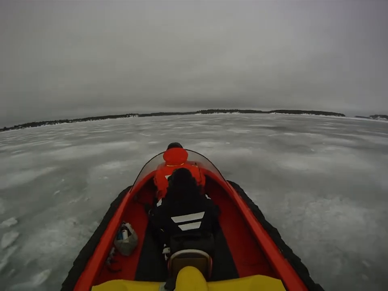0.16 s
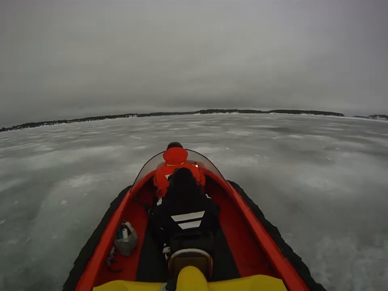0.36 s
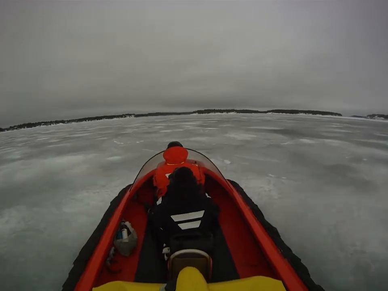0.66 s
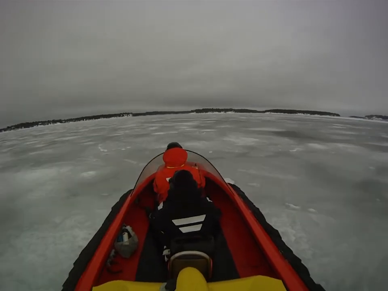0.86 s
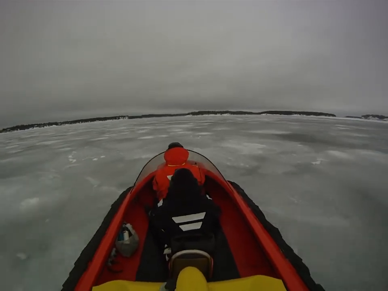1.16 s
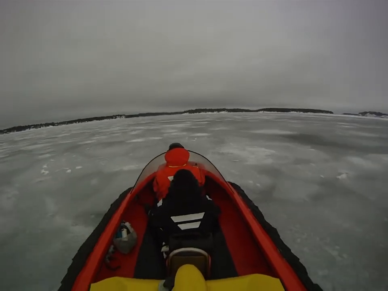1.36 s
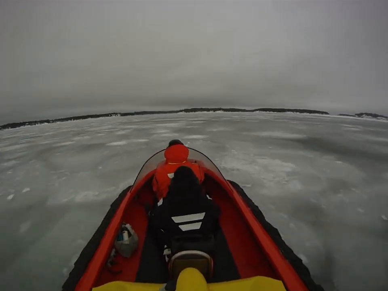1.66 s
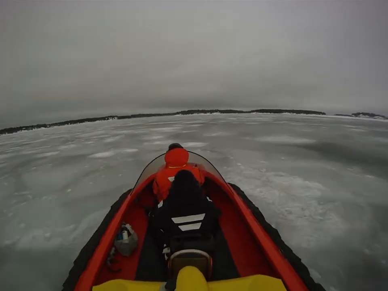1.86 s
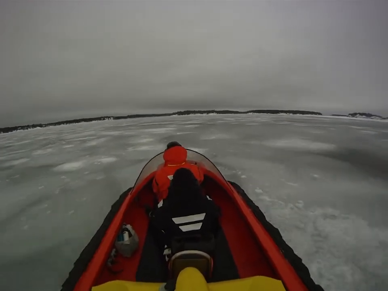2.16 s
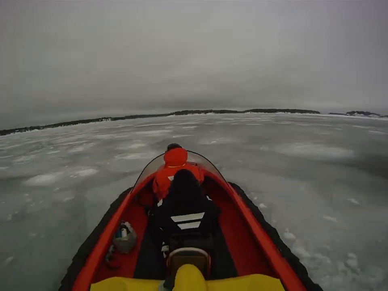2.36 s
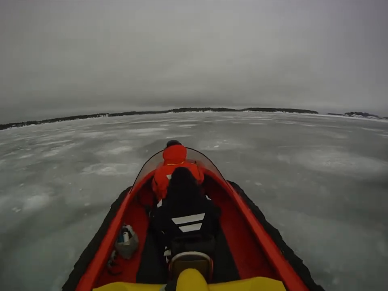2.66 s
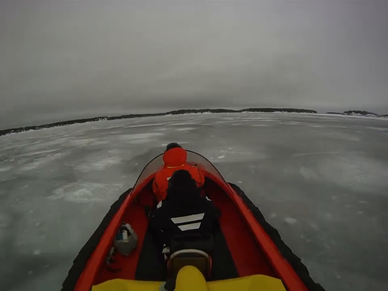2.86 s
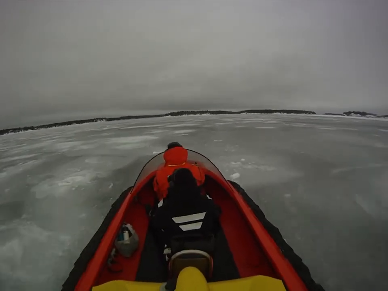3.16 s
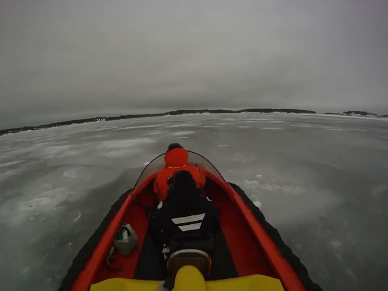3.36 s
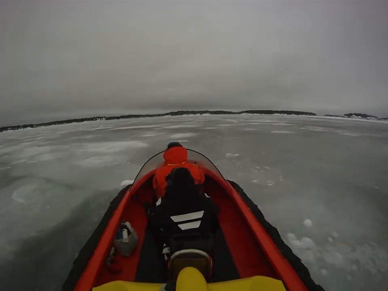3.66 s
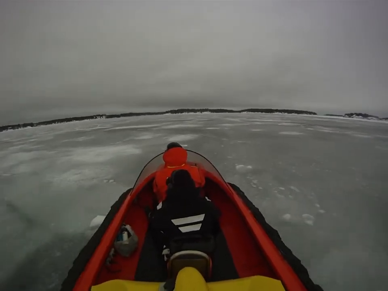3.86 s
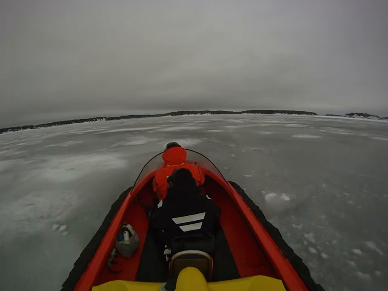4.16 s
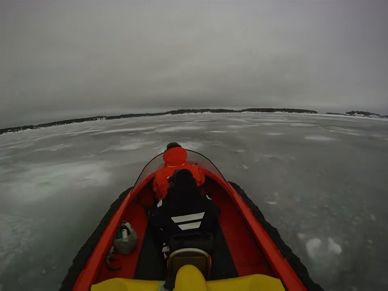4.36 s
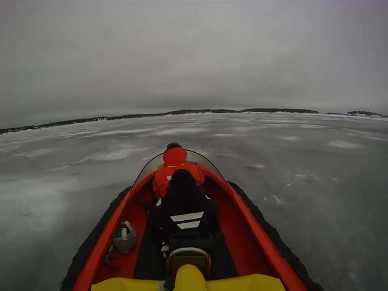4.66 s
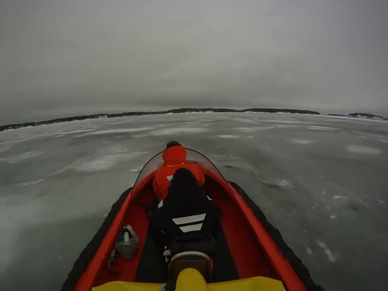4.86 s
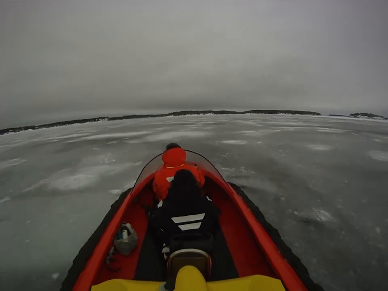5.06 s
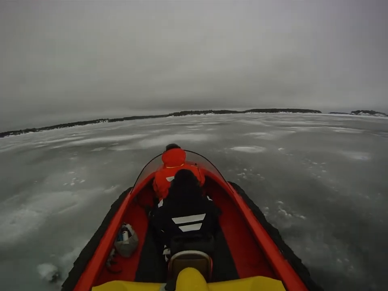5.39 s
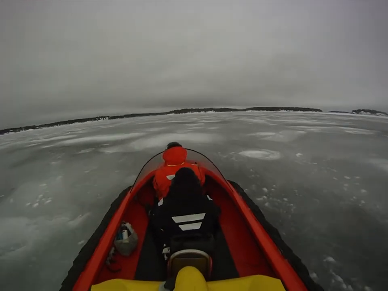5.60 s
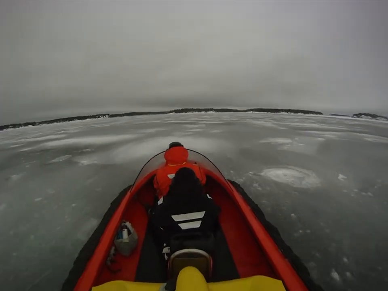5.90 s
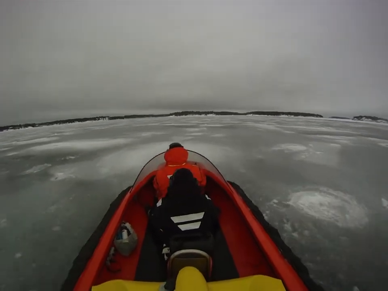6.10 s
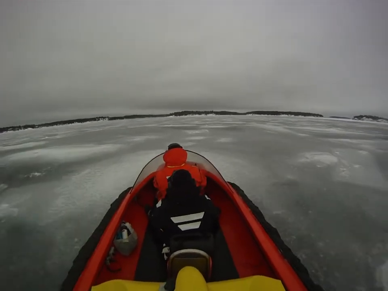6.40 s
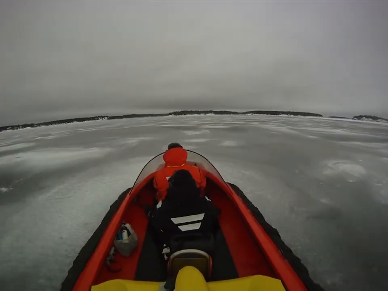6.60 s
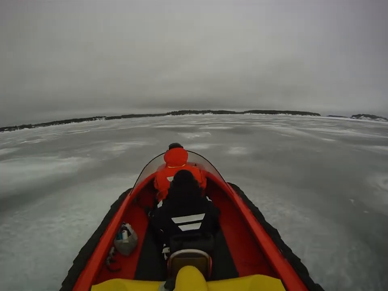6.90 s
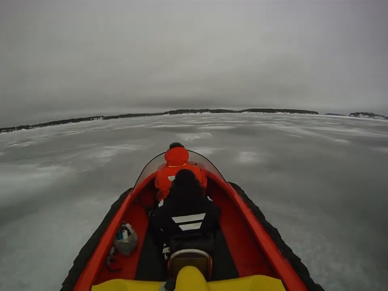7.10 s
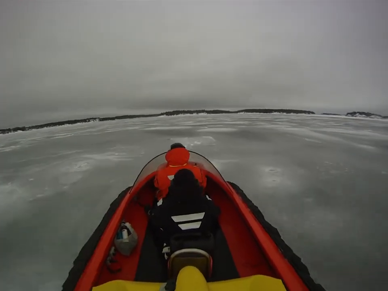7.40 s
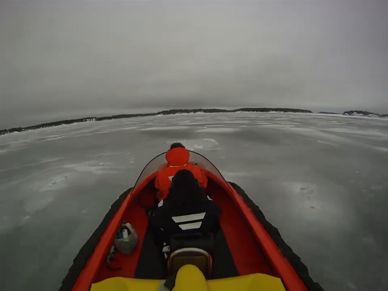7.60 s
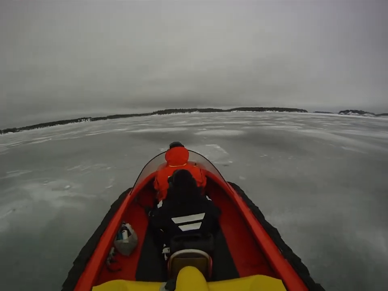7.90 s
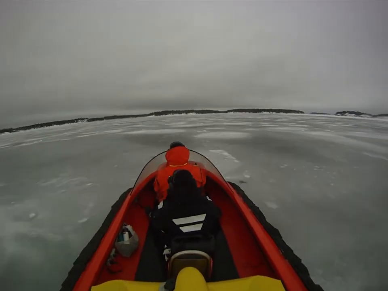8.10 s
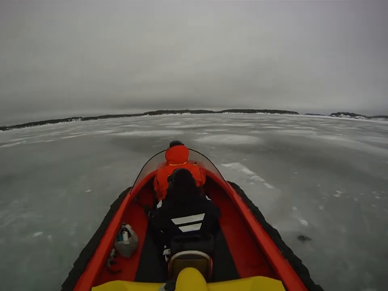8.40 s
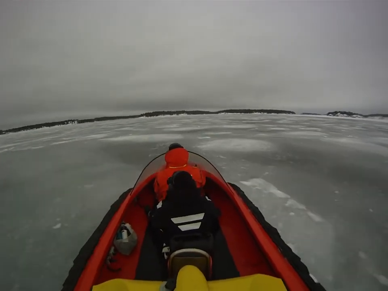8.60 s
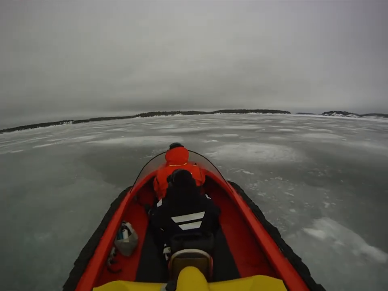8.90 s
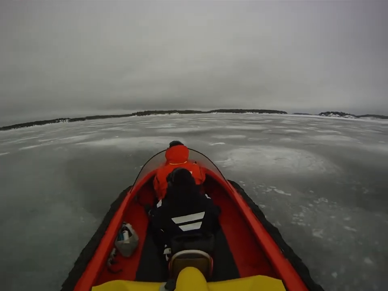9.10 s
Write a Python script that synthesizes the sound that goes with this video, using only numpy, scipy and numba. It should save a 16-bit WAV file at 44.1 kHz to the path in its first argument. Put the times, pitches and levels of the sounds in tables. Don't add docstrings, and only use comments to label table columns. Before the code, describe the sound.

Aboard a small hovercraft on open ice, a microphone in a loose plastic camera case catches a rapid dry rattle, about four taps per engine cycle. Under it run a low shaft drone, thumping exhaust, fan rumble and humming panels. The rattle swells and fades; midway the engine dips, revs up, then eases back amid harder knocks. The sound is harsh, compressed and coarse.

```python
import sys
import numpy as np
from scipy import signal
from scipy.fft import rfft, irfft, next_fast_len
from scipy.io import wavfile
from scipy.ndimage import map_coordinates
from numba import njit

SR = 44100
rng = np.random.default_rng(int(sys.argv[2]) if len(sys.argv) > 2 else 0)


def boost_factor(decibels):
    exponent = np.asarray(decibels, float) / 20
    return 10 ** exponent


def wav_record(signal):
    frames = np.transpose(np.atleast_2d(signal))
    bounded = np.clip(frames, -1, 1)
    quanta = np.round(bounded * 32767).astype(np.int16)
    wavfile.write(sys.argv[1], SR, quanta)


N = 407925

HURRY_END, SKIP = .915, 32

# place in the engine cycle (0-1),
# scatter of that place (0-1), pitch in Hz, rise in ms.
CONTACTS = [
    (0.03, 0.03, 1907, 2),
    (0.311, 0.04, 2150, 2.4),
    (.58, 0.03, 1970, 1.64),
    (0.88, 0.04, 1785, 2.64),
]

# time in seconds, level in dB.
PLAY = [(0.0, -5), (.7, 0.5), (1.0, -6), (1.35, 4), (1.8, -6.5), (2.2, 6.5), (2.6, -3.5), (3.0, 4),
        (3.35, -5.5), (3.85, 3.5), (4.8, -2.5), (5.6, -2.5), (6.4, 2.5), (7.1, -2.5), (7.8, 2.5),
        (8.25, -2), (8.65, 2.5), (9.25, -2)]


def unit(x):
    return x / np.sqrt(np.mean(x ** 2) + 1e-20)


def along(points, hz):
    f, v = np.transpose(points)
    return np.interp(np.log(hz + 1), np.log(f + 1), v)


def true_time(s):
    return s - np.maximum(HURRY_END - s, 0) / SKIP


def curves(rows):
    s, *cols = np.transpose(rows)
    moment = true_time(np.arange(N) / SR)
    return np.array([np.interp(moment, s, c) for c in cols])


def wobble(rate, count=1):
    knots = rng.standard_normal((count, int(N * rate / SR) + 4))
    return np.array([map_coordinates(k, [np.arange(N) * rate / SR], order=1) for k in knots])


def filtered(x, response):
    m = next_fast_len(N + SR // 4)
    return irfft(rfft(x, m) * response(np.fft.rfftfreq(m, 1 / SR)), m)[..., :N]


def resonances(f, modes):
    return sum(boost_factor(db) * 1j * f * w / (c * c - f * f + 1j * f * w) for c, w, db in modes)


def high_pass(f, edge_hz):
    return 1 / (1 + (edge_hz / (f + 1)) ** 12)


def bursts(times, sizes, length):
    at = np.round(times * SR).astype(int)
    keep = (at >= 0) & (at < N)
    t = np.arange(SR // 40) / SR
    hits = np.bincount(at[keep], sizes[keep] ** 2, N)
    power = signal.fftconvolve(hits, np.exp(-2 * t / length))[:N]
    return np.sqrt(np.abs(power) / (length * SR)) * rng.standard_normal(N)


def slips(times, sizes, hz, rise, spread):
    t = np.arange(SR // 60) / SR
    u = t / rise[:, None]
    luck = rng.standard_normal((len(times), 4, 2))
    partial_hz = hz[:, None, None] * (1 + spread * luck[..., :1])
    tone = np.sin(2 * np.pi * partial_hz * t + np.pi * luck[..., 1:])
    wave = u * np.exp(1 - u) * tone.sum(axis=1)
    wave *= (sizes / np.abs(wave).max(axis=1))[:, None]
    at = np.clip(np.round(times * SR).astype(int)[:, None] + np.arange(len(t)), 0, N)
    return np.bincount(at.ravel(), wave.ravel(), N + 1)[:N]


def cycles():
    # time in seconds, cycles per second in Hz.
    speed_rows = [(0.0, 23.59), (0.873, 21.78), (0.971, 21.12), (1.785, 20.96), (2.395, 20.97),
                  (3.613, 20.79), (4.232, 21.35), (4.575, 20.35), (5.015, 18.49), (5.238, 25.96),
                  (5.506, 30.18), (5.747, 30.4), (6.638, 24.15), (7.035, 22.66), (7.604, 21.67),
                  (8.257, 21.8), (8.937, 20.16), (9.25, 21.17)]
    played = np.arange(N) / SR
    start = .8998
    done = start + np.cumsum(np.interp(played, *np.transpose(speed_rows))) / SR
    return np.interp(played, true_time(played), done)


def air():
    # frequency in Hz, level in dB per Hz.
    hiss = [(600, -35), (2500, -26), (4300, 0.5), (5400, 7.5), (6000, -11), (6300, -80)]
    noise = filtered(rng.standard_normal(N), lambda hz: boost_factor(along(hiss, hz)))
    return boost_factor(-49.0 + wobble(3.04)[0]) * unit(noise)


def blades(done):
    # multiple of the cycle rate, level in dB at the duct's pitch.
    blade_rows = [
        (16, -45),
        (20, -51),
    ]
    duct_hz, duct_width_hz = 472, 48
    order, level_db = np.transpose(blade_rows)[:, :, None]
    off = (order * np.gradient(done) * SR - duct_hz) / duct_width_hz
    size = boost_factor(level_db + 1.1 * wobble(4, count=len(order))) / (1 + off ** 4)
    return np.sum(size * np.cos(2 * np.pi * order * done), axis=0)


def fan_rumble(load_db):
    # frequency in Hz, level in dB per Hz.
    rumble_rows = [(12, -38), (20, -32.5), (49, -6), (66, 4.5), (86, -1), (255, -3), (358, -11.5),
                   (416, -39.5), (490, -31), (586, -71), (700, -13), (910, -35.5), (1540, -120)]
    rumble = filtered(rng.standard_normal(N), lambda hz: boost_factor(along(rumble_rows, hz)))
    gusts_db = 1.4 * wobble(12)[0]
    return boost_factor(-25 + load_db + 0.2 + gusts_db) * unit(rumble)


def shaft_drone(done, speed):
    # cycles per second in Hz, level in dB.
    shaft_rows = [(19, -14.5), (21, -15), (22, -17), (23, -19), (24.5, -17), (27, -14.5), (30, -15)]
    return boost_factor(along(shaft_rows, speed) + 1.5) * np.cos(4 * np.pi * done)


def exhaust(done, speed, load_db):
    # multiple of the cycle rate, level in dB.
    exhaust_rows = [(1, -5.5), (2, 0), (3, -13.5), (4, -12), (5, -9), (6, -6), (7, -12.5), (8, -11.5),
                    (9, -13.5), (10, -8.5), (11, -14), (12, -9.5), (13, -11), (14, -15.5), (15, -26.5),
                    (16, -25.5), (17, -28), (18, -39), (19, -44), (20, -31.5), (21, -43), (22, -42.5),
                    (23, -37), (24, -40)]
    # frequency in Hz, level in dB.
    hull = [(40, 2), (90, -16.5), (140, -1.5), (200, 3.5), (270, 9), (330, -13.5), (400, -13.5), (470, -24),
            (560, -27.5), (750, -49)]
    order, level_db = np.delete(np.transpose(exhaust_rows), 1, axis=1)[:, :, None]
    hull_db = along(hull, order * speed) - along(hull, order * 21)
    uneven_db = (speed - 21) * np.where(order % 4, -.9, .15)
    wander_db = 2.2 * wobble(5, count=len(order))
    size = boost_factor(level_db + hull_db + uneven_db + wander_db)
    drift = .25 * wobble(2.5, count=len(order))
    drift += .8 * rng.standard_normal(order.shape)
    delay_s, place = .045, .645
    late = np.interp(np.arange(N) - delay_s * SR, np.arange(N), done) + place
    unrest = np.where(order % 4, 1 + .35 * np.abs(speed - 21), .3)
    late = late + .011 * unrest * wobble(12)[0]
    thump = size * np.cos(2 * np.pi * order * late + drift)
    exhaust_db = -24 + 0.98 * load_db
    return boost_factor(exhaust_db + 6.0) * thump.sum(axis=0)


def engine(done):
    # time in seconds, level in dB.
    load_rows = [(0.0, 1), (0.85, 0), (4.64, -0.5), (5.18, 2), (5.5, -2.5), (6.3, 0), (6.96, -1), (7.39, 2),
                 (8.24, -0.5), (9.25, 2)]
    load_db, = curves(load_rows)
    speed = np.gradient(done) * SR
    return shaft_drone(done, speed) + exhaust(done, speed, load_db) + fan_rumble(load_db)


def panels(when, level_db):
    # pitch in Hz, width in Hz, level in dB.
    panel_rows = [(136, 28, 1), (220.7, 46, 0), (263.3, 33, 0), (353.7, 16, -9)]
    push_share_db = [-6, -0.5, -6.5, -8]
    at = np.clip(np.round((when + .0015) * SR).astype(int), 0, N - 1).ravel()
    push = -np.bincount(at, boost_factor(level_db + push_share_db).ravel(), N)
    drum = boost_factor(2.7 * wobble(6)[0]) * rng.standard_normal(N)

    def ring(f):
        return resonances(f, panel_rows) / (1 + (f / 385) ** 16)

    return boost_factor(-30) * unit(filtered(push, ring)) + boost_factor(-29.5) * unit(filtered(drum, ring))


def contacts(done):
    # cycles per second in Hz, then the dB of each of the four contacts.
    rattle = [(19.1, 1.5, -0.5, -5, -12), (20.67, -11.5, -4.5, 3, -13.5), (20.87, -14, -2.5, -2.5, -13),
              (21.35, -12, -4, -4, -12), (21.65, -3.5, -5, -9, -11.5), (22.24, -4, -4.5, -6.5, -4.5),
              (24.4, -2, -9, -20, -5), (24.4, -6, -8.5, -16.5, -12), (29.64, -8.5, -8, -9.5, -12)]
    play_share = [0.86, 0.27, 0.22, 1]
    # lag of each of the four, in cycles per Hz.
    lag_per_hz = [.055, .03, .03, 0]
    hard_over_db = [-7.5, -5.5, -2, -4.5]
    softer_db_per_hz = [0, 8, 3, 0]
    lag_from_hz, wild_from_hz = 21, 24.5
    turns, sample = np.arange(np.ceil(done[-1]))[:, None], np.arange(N)
    place, scatter, _, _ = np.transpose(CONTACTS)
    luck = rng.standard_normal((len(turns), 4, 5))
    start = np.interp(turns[:, 0] + .5, done, sample).astype(int)
    speed = (np.gradient(done) * SR)[start]
    cycles_hz, *tap_db = np.transpose(rattle)
    level_db = np.transpose([np.interp(speed, cycles_hz, db) for db in tap_db])
    level_db += curves(PLAY)[0][start, None] * play_share + 1.7 * luck[..., 1]
    limit_db = hard_over_db + np.outer(np.maximum(speed - lag_from_hz - .3, 0), softer_db_per_hz)
    hard = level_db + 1.2 * luck[..., 3] > limit_db
    lag = np.outer(np.maximum(speed - lag_from_hz, 0), lag_per_hz)
    wild = .03 * np.maximum(speed - wild_from_hz, 0)[:, None]
    scatter = scatter * np.where(hard, .5, 1) + wild
    when = np.interp(turns + place + lag + scatter * luck[..., 0], done, sample) / SR
    level_db = np.where(when > 0, level_db, -120)
    return when, level_db, hard, speed, luck


def lens_door(when, level_db, luck, hit_s, hit_db):
    pip = (when[:, [0, 2]] + [.001, .0028]).ravel()
    answer_db = np.transpose([level_db[:, 0] + 1, 0 * level_db[:, 2]]) + 2.5 * luck[:, :2, 2]
    each_pip, each_hit = np.ones(len(pip)), np.ones(len(hit_s))
    door = slips(pip, boost_factor(answer_db).ravel(), 3600 * each_pip, .0013 * each_pip, spread=.05)
    passed_on = boost_factor(hit_db - 22)
    jolted = slips(hit_s, passed_on, 3700 * each_hit, 0.0014 * each_hit, spread=0.086)
    return boost_factor(-20.5 + curves(PLAY)[0]) * unit(door) + boost_factor(18) * jolted


def bare_ticks(knock_s, knock_tick_db, first_s, first_db, speed, luck):
    # time in seconds, peak in dB.
    tick_rows = [(0.0943, -22), (0.2244, -26), (0.395, -23), (0.179, -30), (3.013, -26), (3.934, -23),
                 (5.2248, -22), (5.308, -19), (5.5965, -24), (5.7856, -32), (5.9297, -25), (5.971, -20.5),
                 (6.2013, -24), (6.322, -23), (6.345, -21), (6.4183, -20.5), (6.8973, -20), (7.243, -24),
                 (7.6126, -48), (8.4873, -23)]
    tick_s, tick_db = np.transpose(tick_rows)
    slow_db = 8 * np.minimum(speed - 21.7, 0)
    bare_db = first_db - 28 + slow_db + 3 * luck[:, 0, 2]
    tick_s = np.r_[true_time(tick_s), knock_s, first_s]
    tick_db = np.r_[tick_db, knock_tick_db, bare_db]
    return bursts(tick_s, boost_factor(tick_db + 52.5), 0.003)


def scrapes(when, level_db, size, hit_s, hit_size):
    stray = rng.random((900, 2))
    scrape = boost_factor(26.5) * bursts(when.ravel(), size.ravel(), 0.0022)
    scrape += boost_factor(24.5) * bursts(hit_s, hit_size, 0.0029)
    scrape += boost_factor(26.5) * bursts(when[:, 2] + 0.0032, boost_factor(level_db[:, 2]), 0.003)
    scrape += boost_factor(8) * bursts(stray[:, 0] * N / SR, boost_factor(10 * stray[:, 1]), .003)
    scrape += boost_factor(-9.5 + 2.9 * wobble(25)[0]) * rng.standard_normal(N)
    return filtered(scrape, lambda f: (1 - 0.62 * high_pass(f, 3270)) * (1 - 0.23 * high_pass(f, 3990)))


def case(done):
    # time in seconds, peak in dB, pitch in Hz, level of the tick in dB.
    knocks = [(0.1251, 3, 2196, -31), (0.2104, 0, 2050, -25), (0.2968, 0.5, 2130, -41),
              (0.4389, 0, 2130, -20), (0.4733, 2, 2020, -50), (0.6609, -2.5, 2260, -21),
              (1.0999, 1, 1850, -50), (2.0882, 1, 1850, -52), (4.6723, 0, 2250, -50), (4.785, 1, 2020, -50),
              (5.037, 0.5, 2320, -50), (5.3692, 3.5, 2140, -24), (5.4745, 1.5, 2250, -23.5),
              (5.67, 1, 2110, -16), (5.8682, -2.5, 2140, -26), (6.2417, 1.5, 2200, -40),
              (6.4438, -2, 1950, -19), (6.5236, 2.5, 2180, -10.5), (6.6852, 0, 2070, -20),
              (6.8094, 2, 2156, -13), (6.8444, 1.5, 2310, -23), (6.9312, 5.5, 2280, -32),
              (7.018, 0.5, 2200, -20), (7.1138, -1, 1890, -17.5), (7.1766, 1.5, 2300, -24),
              (7.2933, -0.5, 2240, -17), (7.3293, 2, 2030, -36), (7.8411, 2, 2000, -21),
              (8.2956, 0.5, 2150, -30), (8.9476, 1, 1890, -50)]
    # pitch in Hz, width in Hz, level in dB.
    case_modes = [(757, 180, -12), (991, 33, -9.5), (1314, 208, -4), (1635, 114, -2), (1890, 145, -5),
                  (2150, 199, -2.5), (2895, 480, -13), (3580, 247, -4), (4000, 300, -13), (5050, 2100, -18)]
    # frequency in Hz, level in dB.
    port = [(300, -26), (600, -11.5), (1000, -4.5), (2000, -1.5), (3500, -6), (4500, -15.5), (5500, -17),
            (6000, -20.5), (6300, -90)]
    hard_level_db = [-1, -3, -3.5, -4]
    contact_pad_db = [1, -3.5, -3.5, -3]
    contact_rise_s = [.00056, .0007, .0009, .0007]
    when, level_db, hard, speed, luck = contacts(done)
    count, taps = len(when), when.ravel()
    _, _, hz, rise_ms = np.transpose(CONTACTS)
    knock_s, knock_db, knock_hz, knock_tick_db = np.transpose(knocks)
    knock_s = true_time(knock_s)
    free = (np.abs(when[..., None] - knock_s).min(axis=-1) > .006) & (when > 0)
    size = boost_factor(level_db) * (free & ~hard)
    hard_db = np.where(free & hard, hard_level_db + 1.6 * luck[..., 4], -120)

    hit_s = np.r_[knock_s, taps + .001]
    hit_db = np.r_[knock_db, np.minimum(hard_db, 0).ravel()]
    hard_hz = [2120, 2150, 1960, 2000] * (1 + .05 * luck[..., 2])
    hit_hz = np.r_[knock_hz, hard_hz.ravel()]
    pad_db = np.r_[np.zeros(len(knock_s)), np.tile(contact_pad_db, count)]
    rise = np.r_[np.full(len(knock_s), contact_rise_s[0]), np.tile(contact_rise_s, count)]
    jolt = boost_factor(hit_db + 1.6 * np.maximum(hit_db + 0.5, 0))

    shell = slips(taps, size.ravel(), np.tile(hz, count), np.tile(rise_ms / 1000, count), spread=0.1385)
    shell += boost_factor(4) * slips(hit_s, jolt, hit_hz, rise, spread=0.036)
    scrape = scrapes(when, level_db, size, hit_s, jolt * boost_factor(pad_db))
    door = lens_door(when, level_db, luck, hit_s, hit_db + pad_db)
    first_db = hard_db[:, 0] - hard_level_db[0]
    crack = bare_ticks(knock_s, knock_tick_db, when[:, 0], first_db, speed, luck)
    crack = filtered(crack, lambda f: high_pass(f, 1900) + 0.096)
    ringing = filtered(shell + scrape + door + crack,
                       lambda f: resonances(f, case_modes) * boost_factor(along(port, f)))
    return ringing + panels(when, level_db)


def scene():
    done = cycles()
    return (air() + blades(done) + engine(done) + case(done))[None]


@njit
def rider(x, ceiling, attack, release):
    out, gain = np.empty_like(x), 1.0
    for i in range(len(x)):
        want = min(1.0, ceiling / (abs(x[i]) + 1e-9))
        gain += (want - gain) * (attack if want < gain else release)
        out[i] = x[i] * gain
    return out


def roll_off(x):
    return signal.sosfilt(signal.butter(12, 16130, fs=SR, output="sos"), x)


def record(dry):
    # frequency in Hz, level in dB.
    top_rows = [(14500, -1), (15200, -2), (15600, -17), (16000, -42), (16300, -90)]
    x = filtered(dry[0], lambda hz: 1 / (1 + (29 / (hz + 1)) ** 6))
    x = rider(x, .65, 1 / (.002 * SR), 1 / (.06 * SR))
    x = x / (1 + np.abs(x / 1.05) ** 5) ** (1 / 5)
    coarse = signal.resample_poly(x, 40, 147)
    step = np.arange(len(coarse) * 4)
    late = np.maximum(round(HURRY_END * 48000) - step, 0) // SKIP
    held = coarse[np.abs(step - late) // 4]
    out = signal.resample_poly(held, 147, 160)[:N]
    out = filtered(np.pad(out, (0, N - len(out))), lambda hz: boost_factor(along(top_rows, hz)))
    return roll_off(out[None])


dry = scene()
out = record(dry)
wav_record(out)
```